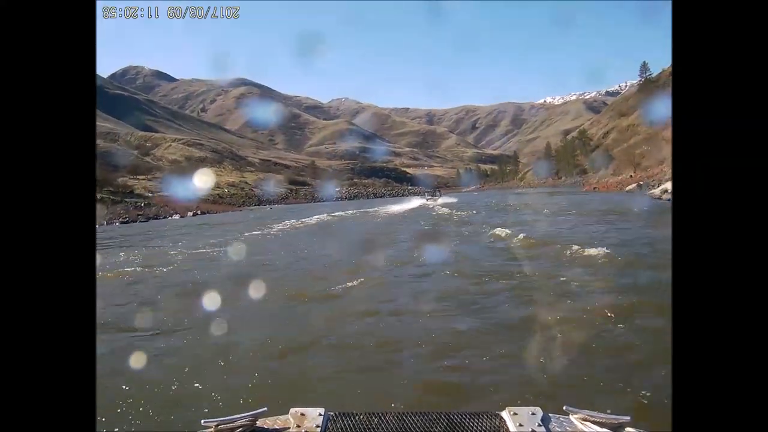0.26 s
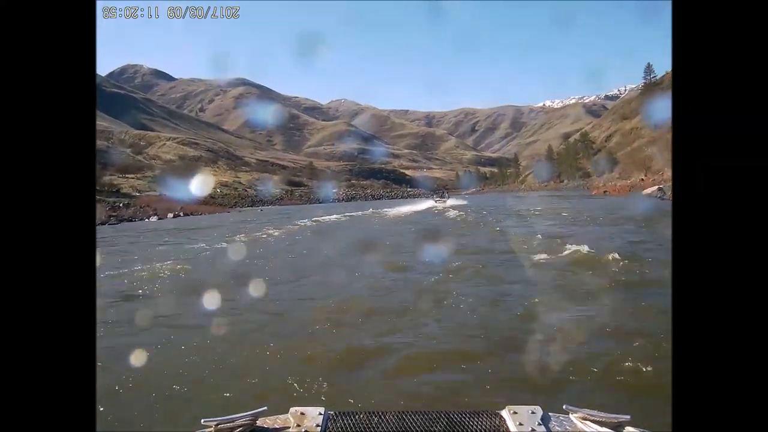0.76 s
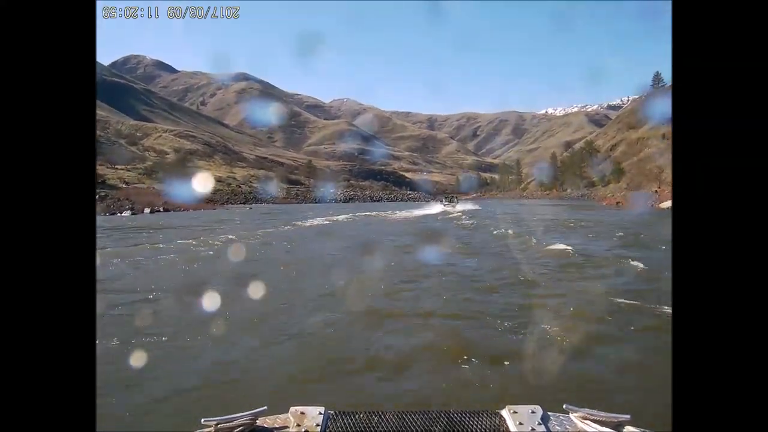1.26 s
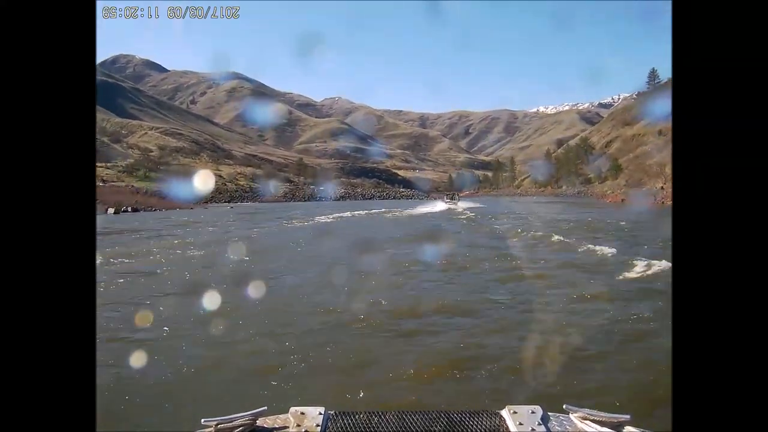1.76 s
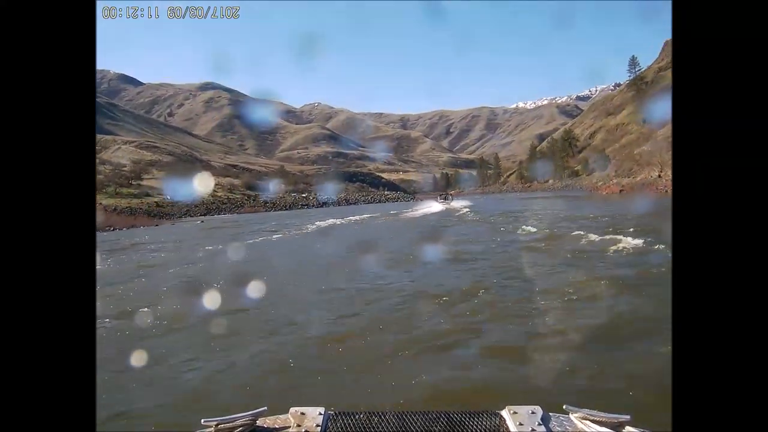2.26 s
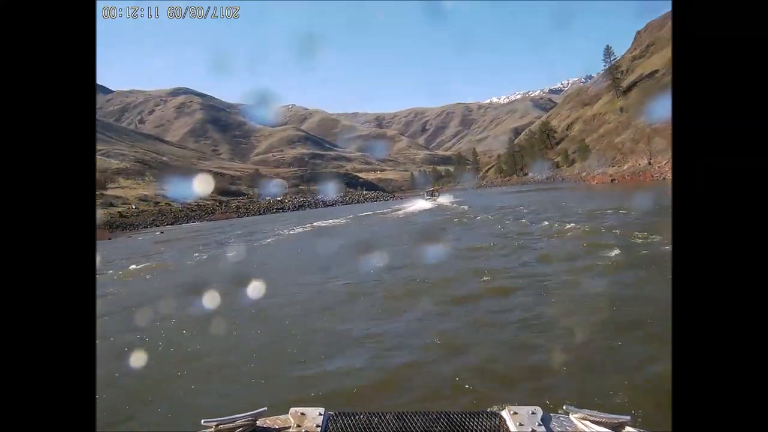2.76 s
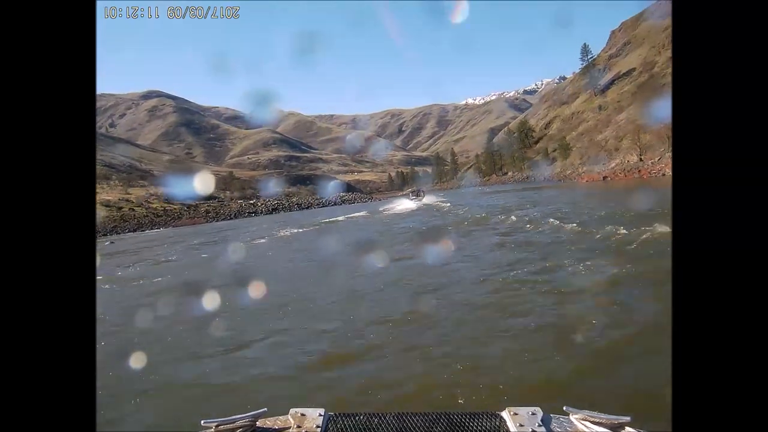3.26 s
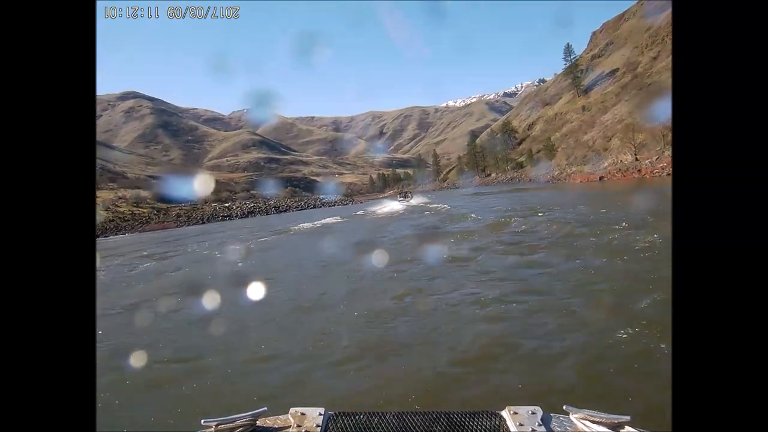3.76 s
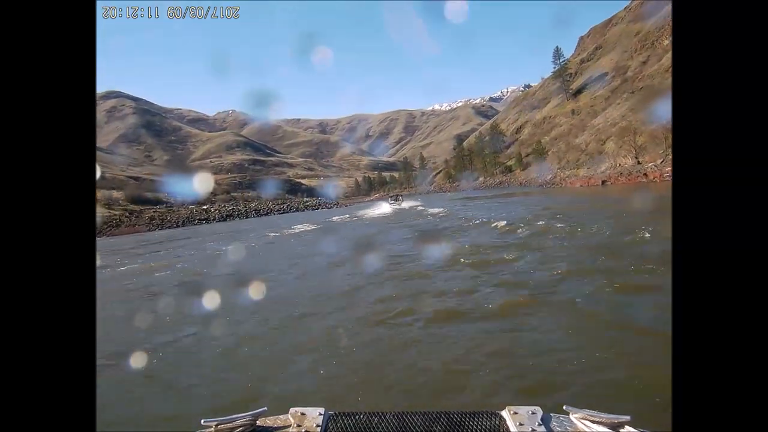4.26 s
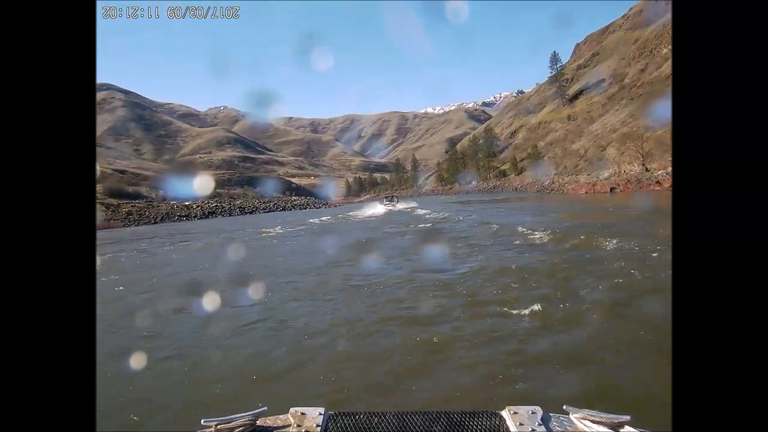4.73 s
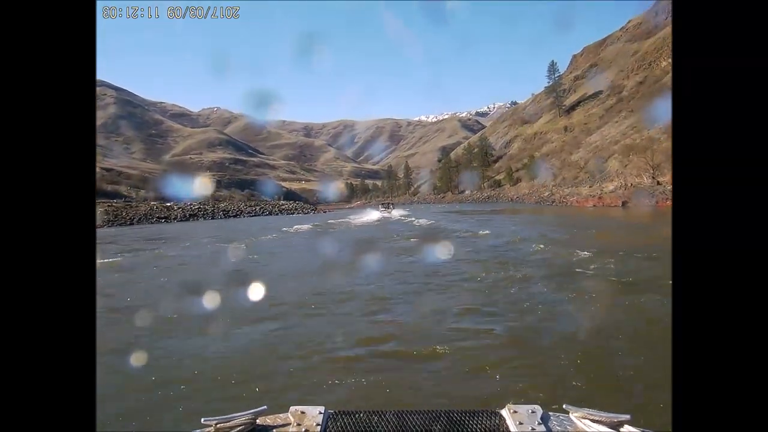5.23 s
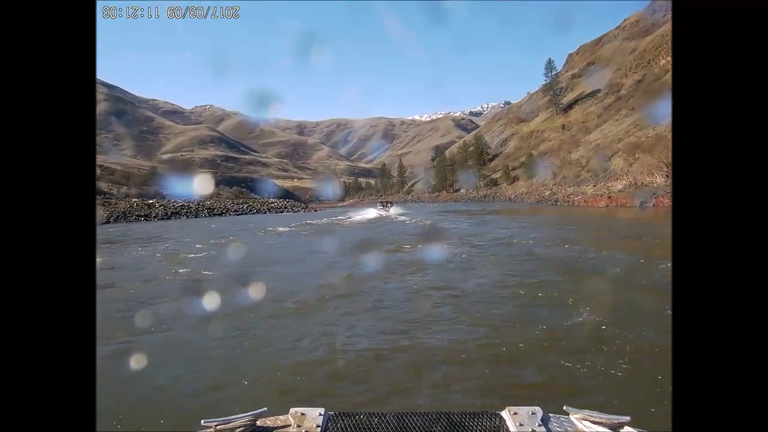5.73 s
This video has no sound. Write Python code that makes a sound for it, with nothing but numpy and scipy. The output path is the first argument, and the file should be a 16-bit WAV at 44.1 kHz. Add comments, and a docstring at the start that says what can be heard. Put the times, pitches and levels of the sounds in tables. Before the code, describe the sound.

Aboard a jet boat planing on a river, the microphone sits in a closed housing on the hull, so everything is close, boxy and muffled. A steady low engine hum holds its speed throughout, with a rougher, wavering hum above it. Water and jet roar continuously in the midrange, dipping slightly around 1.3 seconds and a little fuller later, beneath a thin spray hiss and a barely audible high electronic whine. From 0.2 to 0.8 seconds, quick bassy hull thuds come with dry knocks; another hit falls near 0.95. The hardest cluster, 1.4 to 1.9, jolts the mount into slaps and rattling clicks. More pounding follows at 2.15-2.45 and 3.0-3.3. Then the ride smooths, leaving mostly engine and water, with light bumps around 4.0, 4.3 and 4.8. A fresh burst of thumps and knocks arrives at 5.3-5.5, then calmer running to the end.

```python
"""Jet boat on a river

A jet boat planes along a river, heard inside a closed housing fixed to the hull.
The engine hums as sines on orders of its cycle; waves pound the hull as noise-driven modes and single swings.
Water and jet roar as noise through the resonances of the housing, above a faint electronic whine.
The mount slaps in single knocks and rattles in random clicks when the hull swings hard."""
import sys
import numpy as np
from scipy import signal
from scipy.io import wavfile
from scipy.ndimage import uniform_filter1d

SR = 44100
rng = np.random.default_rng(int(sys.argv[2]) if len(sys.argv) > 2 else 0)


def amplitude_ratio(level_db):
    """Convert a level in decibels to the matching linear amplitude (field) ratio."""
    exponent = np.asarray(level_db, float) / 20
    return 10 ** exponent


def bounce(signal):
    """Save signal as a 16-bit WAV file at the path given by the first command-line argument."""
    frames = np.transpose(np.atleast_2d(signal))
    limited = np.clip(frames, -1, 1)
    pcm = np.round(limited * 32767).astype(np.int16)
    wavfile.write(sys.argv[1], SR, pcm)


N = 264159

# hull panels under the pounding: (frequency [Hz], width of each pass [Hz], relative level [dB])
HULL_MODES = [(42.9, 22, -7), (61.4, 13, 1.5), (74.8, 11, 4), (101.5, 11.9, -2), (125.4, 6.8, -13),
              (152.4, 32, -18.5)]
# housing and mount: (frequency [Hz], width of each pass [Hz], relative level [dB])
HOUSING_MODES = [(189.6, 97, -8), (306.7, 140, -11), (513.5, 154, -8.5), (626, 113, -11.5),
                 (693.7, 76, -0.5), (734, 95, -8.5), (829, 103, -2), (928.7, 134, -2.5), (1134, 296, -10),
                 (1415, 295, -9), (1743.4, 149, -4.5), (2120, 154, -28), (2366, 340, -30.5),
                 (2795, 190, -33), (2986, 130, -33)]
# what the housing wall lets through above: (frequency [Hz], width of each pass [Hz], relative level [dB])
WALL_MODES = [(3070, 1030, -6), (4234, 750, -2), (5710, 3400, -7.5), (6940, 980, -1.5), (8440, 1050, -6.5),
              (9310, 1150, -3), (10660, 1560, -2.5), (12400, 1500, -11), (13300, 920, -8),
              (14300, 1100, -20), (15400, 1900, -8.5)]


def rms_one(x):
    """Scale to rms 1."""
    return x / np.sqrt(np.mean(x ** 2) + 1e-20)


def in_time(rows):
    """Columns of a curve table at every sample."""
    s, *columns = np.transpose(rows)
    return [np.interp(np.arange(N) / SR, s, c) for c in columns]


def drift(rate):
    """Slow chance of spread 1: noise twice through a one-pole low-pass with its corner at rate [Hz]."""
    # computed at every 40th sample, after a run-in of 2000 steps
    r = np.exp(-80 * np.pi * rate / SR)
    noise = rng.standard_normal(N // 40 + 2002)
    slow = signal.lfilter([1], [1, -2 * r, r * r], noise)[2000:]
    return np.interp(np.arange(N) / 40, np.arange(len(slow)), rms_one(slow))


def resonate(x, hz, width_hz):
    """A resonance passed twice, so that the valleys stay dark; gain 1 on top."""
    r = np.exp(-np.pi * width_hz / SR)
    gain = (1 - r * r) / 2
    stage = [gain, 0, -gain, 1, -2 * r * np.cos(2 * np.pi * hz / SR), r * r]
    return signal.sosfilt([stage, stage], x + 1e-18)


def noisy_modes(modes, flutter_db, rate):
    """Every mode is driven by noise of its own, fluttering partly with the others; rms 1."""
    shared = drift(rate)
    total = 0
    for hz, width_hz, db in modes:
        level = amplitude_ratio(db + flutter_db * (shared + drift(rate)))
        total = total + level * resonate(rng.standard_normal(N), hz, width_hz)
    return rms_one(total)


def struck_modes(modes, clicks):
    """One click train strikes all modes, signs alternating."""
    return sum((-1) ** k * amplitude_ratio(db) * resonate(clicks, hz, width_hz)
               for k, (hz, width_hz, db) in enumerate(modes))


def dip(x):
    """Narrow dips where paths through the housing cancel, each cut to its depth."""
    # (frequency [Hz], width [Hz], gain at the bottom [dB])
    cancellations = [(657, 31, -9.5), (759, 17, -2.5), (1091, 14, -12), (1233, 20, -8), (1461, 12, -12),
                     (1575, 24, -5.5), (1694, 39, -5), (2300, 110, -4.5), (2590, 96, -5)]
    for hz, width_hz, db in cancellations:
        notched = signal.lfilter(*signal.iirnotch(hz, hz / width_hz, SR), x)
        x = amplitude_ratio(db) * x + (1 - amplitude_ratio(db)) * notched
    return x


def ride_db(wave_offset_db):
    """Pounding level: the chop, plus each wave rising, holding for its length and dying away."""
    # small chop that always drums on the hull: (time [s], level [dB])
    chop = [(0.0, -28), (0.43, -30.5), (1.32, -31.5), (1.47, -32), (4.72, -34.5), (5.44, -27.5),
            (5.99, -34)]
    # larger waves passing under the hull: (start [s], length [s], level before the offset [dB])
    waves = [(0.188, 0.056, -24), (0.341, 0.03, -19.5), (0.428, 0.038, -29), (0.485, 0.054, -26),
             (0.686, 0.084, -25), (0.895, 0.041, -19), (0.93, 0.078, -25.5), (1.06, 0.047, -25),
             (1.372, 0.046, -22), (1.474, 0.047, -21), (1.541, 0.039, -27), (1.693, 0.018, -24),
             (1.72, 0.053, -17), (1.894, 0.025, -19.5), (2.157, 0.081, -15), (2.276, 0.03, -30),
             (2.354, 0.088, -25), (2.997, 0.128, -18.5), (3.11, 0.029, -28), (3.196, 0.044, -25),
             (3.285, 0.028, -17.5), (4.01, 0.057, -20), (4.337, 0.041, -22), (4.652, 0.028, -26.5),
             (5.003, 0.14, -26), (5.316, 0.2, -29)]
    rise_s, fall_s = 0.0084, 0.015
    t = np.arange(N) / SR
    chop_db, = in_time(chop)
    power = amplitude_ratio(chop_db) ** 2
    for start, length, db in waves:
        rise = np.clip((t - start) / rise_s + 1, 0, 1)
        fall = np.exp(-np.maximum(t - start - length, 0) / fall_s)
        power = power + (amplitude_ratio(db + wave_offset_db) * rise * fall) ** 2
    return 10 * np.log10(power)


def wave_swing_db():
    """Swing of the full pounding level about its mean, which jet and splash follow in part."""
    pounding_db = ride_db(0)
    return pounding_db - pounding_db.mean()


def load_db():
    """Load on the jet as a curve of water roar level."""
    # (time [s], level [dB])
    load = [(0, -31.5), (.4, -31.5), (.7, -33.5), (1.35, -35), (1.7, -33), (2.5, -32.5), (3.0, -33),
            (3.4, -31.5), (4.1, -32), (4.45, -31), (4.75, -31.5), (5.3, -31), (5.99, -32)]
    return in_time(load)[0]


def load_swing_db():
    """Swing of the load about its mean."""
    level_db = load_db()
    return level_db - level_db.mean()


def whine():
    """Steady electronic whine: pure sines."""
    # (frequency [Hz], rms level [dB])
    tones = [(6857, -77), (13714, -71)]
    t = np.arange(N) / SR
    return sum(np.sqrt(2) * amplitude_ratio(db) * np.sin(2 * np.pi * hz * t) for hz, db in tones)


def spray():
    """Steady fluttering hiss of spray through the wall of the housing."""
    return amplitude_ratio(-58) * noisy_modes(WALL_MODES, flutter_db=1.36, rate=31.0)


def splash():
    """Harder pounding throws more water against the plating: noise in the upper housing modes."""
    level_db = -60.5 + 0.27 * wave_swing_db()   # share of the waves' swing in dB
    return amplitude_ratio(level_db) * noisy_modes(HOUSING_MODES[11:], flutter_db=2.64, rate=31.0)


def jet():
    """Jet noise in the middle housing modes, following load and waves by shares of their swings in dB."""
    level_db = -37 + 0.55 * load_swing_db() + 0.074 * wave_swing_db()
    return amplitude_ratio(level_db) * noisy_modes(HOUSING_MODES[8:11], flutter_db=1.0, rate=35.0)


def intake():
    """The intake band near 700 Hz opens up most with load."""
    level_db = -35.5 + 2.7 * load_swing_db()
    return amplitude_ratio(level_db) * noisy_modes(HOUSING_MODES[4:6], flutter_db=0.76, rate=16.0)


def water_roar():
    """Water roars as noise through the housing modes around the intake band, at the level of the load."""
    modes = HOUSING_MODES[:4] + HOUSING_MODES[6:8]
    return amplitude_ratio(load_db()) * noisy_modes(modes, flutter_db=1.06, rate=11.7)


def rattle_clicks(shake):
    """Loose play in the mount: clicks fall when the hull swings hard one way."""
    lag_s, clicks_per_s, spread_db = 0.0022, 650.0, 3.0   # click rate at a swing of 1
    late_shake = np.roll(shake, round(lag_s * SR))
    swing = np.clip(-late_shake / 0.051, 0, 2.5)
    born = rng.random(N) < clicks_per_s * swing ** 2 / SR
    sizes = amplitude_ratio(spread_db * np.minimum(rng.exponential(1, N), 3.0))
    return born * sizes * rng.choice([-1, 1], N)


def mount_rattle(clicks):
    """Hard, small contacts excite the upper housing modes most."""
    contact = signal.lfilter([1, -1], [1, -.8], amplitude_ratio(-6.5) * clicks)
    return struck_modes(HOUSING_MODES, contact)


def knocks():
    """Each slap is one hard contact with a faint dying cluster after it; the cluster alone drives the treble."""
    # slaps that jolt the mount: (time [s], relative level [dB], extra brightness [dB])
    jolts = [(0.185, -34, -3), (0.447, -23, 3), (0.6972, -17, -5), (0.714, -24, 2), (0.7296, -18, 1),
             (0.813, -30, -3), (0.9554, -26, 14), (1.162, -22.5, -2), (1.3708, -22, 0), (1.4716, -18, -3),
             (1.4984, -14, 5), (1.505, -18, 1), (1.5396, -29, 3), (1.5515, -34, 4), (1.6806, -16, 3),
             (1.683, -22, 2), (1.697, -22, 2), (1.7057, -14.5, 7), (1.7096, -24, 0), (1.74, -32, 6),
             (1.831, -32, 3), (1.905, -25, 5), (2.19, -34, -2), (2.228, -17.5, 5), (2.3138, -22, 2),
             (2.4289, -26, -3), (2.696, -22, -1), (2.999, -19, 3), (3.0765, -21, 1), (3.1078, -28, 13),
             (3.1572, -18, -3), (3.162, -30, -2), (3.2913, -24.5, 9), (4.304, -24, -4), (4.8044, -21, -6),
             (5.018, -37, 4), (5.186, -26, 5), (5.328, -18, 3), (5.344, -25, 1), (5.4604, -21.5, -1)]
    length = 1500   # samples in a cluster
    body, bright = np.zeros((2, N + length))
    t = np.arange(length) / SR
    fade = 0.22 * np.exp(-t / 0.0025) + 0.061 * np.exp(-t / 0.0096)
    clusters = rng.standard_normal((len(jolts), length)) * fade
    for (s, db, bright_db), cluster in zip(jolts, clusters):
        at = round(s * SR)
        body[at] += 2.67 * amplitude_ratio(db)
        body[at:at + length] += amplitude_ratio(db) * cluster
        bright[at:at + length] += amplitude_ratio(db + bright_db) * cluster
    return body[:N], bright[:N]


def slaps(body, bright):
    """A slap presses the mount shut, so it rings only in a few damped modes."""
    # (frequency [Hz], width of each pass [Hz], gain [dB])
    shut_modes = [(835, 410, 20), (1290, 740, 12), (1730, 364, 16.5), (2460, 870, -4.5)]
    low_pass = signal.butter(4, 2280, fs=SR, output="sos")   # corner in Hz
    dull = signal.sosfilt(low_pass, body)
    return struck_modes(shut_modes[:3], dull) + struck_modes(shut_modes[3:], bright)


def ticks(clicks, bright):
    """Treble of rattle and slaps; the wall passes the lower treble of the ticks best."""
    source = amplitude_ratio(-47.0) * clicks + amplitude_ratio(-21) * bright
    return struck_modes(WALL_MODES, signal.lfilter([1], [1, -.6], source))


def engine():
    """Sines on the orders of the cycle; uneven firing makes each waver in level and phase, high orders most."""
    # (multiple of the cycle, level relative to the engine level [dB])
    orders = [(1, -20), (2, -8.5), (3, -3), (4, -3), (5, -12), (6, -12), (7, -21), (8, -8), (9, -16),
              (10, -17), (11, -22), (12, -19), (13, -11.5), (14, -20.5), (15, -27), (16, -19), (18, -17.5),
              (19, -15.5), (20, -18), (21, -16), (22, -20), (23, -18), (24, -16), (25, -12), (27, -24.5),
              (28, -6.5), (29, -14.5), (30, -13), (38, -14.5), (48, -17.5)]
    # orders that swell or fade for a while: (multiple of the cycle, middle [s], length [s], change [dB])
    swells = [(8, 0.96, 0.33, -3), (8, 4.0, 0.79, -3.5), (8, 5.9, 1.57, -12), (13, 1.54, 0.78, -9.5),
              (10, 4.0, 0.78, 3), (13, 2.8, 3, 6), (13, 5.6, 0.8, -4.5), (28, 2.4, 3.9, -5)]
    engine_db, cycle_hz, speed_wander = -35, 24.68, .0008   # wander as a share of the cycle rate
    t = np.arange(N) / SR
    turn = 2 * np.pi * np.cumsum(cycle_hz * (1 + speed_wander * drift(0.495))) / SR
    out = 0
    for order, db in orders:
        swell_db = sum(change * np.exp(-(2 * (t - middle) / length) ** 4)
                       for k, middle, length, change in swells if round(k) == round(order))
        loose = 0.18 + min(order / 27.9, 1) ** 4
        level = np.sqrt(2) * amplitude_ratio(engine_db + db + swell_db + 2.2 * loose * drift(1.75))
        waver = 0.096 * drift(2.5) + 1.97 * (loose - .2) * drift(8.1)   # radians
        out = out + level * np.sin(order * turn + waver + rng.uniform(0, 2 * np.pi))
    return out


def wave_drumming():
    """Chop and waves drum at random on the hull panels: noise through their modes."""
    drumming = noisy_modes(HULL_MODES, flutter_db=1.8, rate=8.2)
    # held fairly even, so that the waves shape its level
    power = uniform_filter1d(drumming ** 2, round(0.027 * SR))
    drumming = rms_one(drumming / (power + 0.15) ** 0.26)
    return amplitude_ratio(ride_db(-9)) * drumming   # waves are lowered here, beside their drops


def drops():
    """Each hard drop onto the water swings the hull: a small lift, a deep trough, a rebound that settles."""
    # (deepest moment [s], depth of the single swing [dB])
    falls = [(0.2012, -19), (0.213, -17.5), (0.242, -21.5), (0.2534, -18), (0.309, -17.5), (0.361, -18.5),
             (0.446, -22), (0.543, -19), (0.6466, -22), (0.7124, -19.5), (0.727, -15.5), (0.7435, -24),
             (0.755, -28), (0.94, -16.5), (0.9546, -16), (1.469, -16.5), (1.4815, -15.5), (1.4987, -16),
             (1.5101, -22), (1.551, -16), (1.578, -21.5), (1.6677, -20), (1.68, -12), (1.828, -18),
             (2.197, -20), (2.209, -24), (2.2262, -17.5), (2.29, -19.5), (2.308, -23), (2.3894, -20.5),
             (3.0063, -22.5), (3.021, -18.5), (3.056, -25), (3.0752, -25.5), (3.0863, -17.5),
             (3.1558, -16.5), (3.2043, -20), (3.2492, -18.5), (3.2842, -23), (3.2962, -22), (3.3164, -23),
             (4.937, -22.5), (5.313, -20), (5.3265, -18), (5.3415, -15), (5.3572, -23), (5.3788, -17),
             (5.4084, -18.5), (5.4612, -23)]
    swing_hz, build_s, settle_s = 76, .006, .0068
    sharpness = .2   # share of the octave that narrows the trough
    t = np.arange(-2000, 2000) / SR
    out = np.zeros(N + 4000)
    turn = 2 * np.pi * swing_hz * t
    swing = -(np.cos(turn) + sharpness * np.cos(2 * turn)) / (1 + sharpness)
    swing = swing * np.exp(-.5 * (t / np.where(t < 0, build_s, settle_s)) ** 2)
    for s, db in falls:
        at = round(s * SR)
        out[at:at + len(t)] += amplitude_ratio(db) * swing
    return out[2000:N + 2000]


def hull_pounding():
    """Drumming and drops, which ring the panels, on a hull that yields more downwards than upwards."""
    hits = drops()
    ringing = amplitude_ratio(-8.5) * struck_modes(HULL_MODES[1:4], hits)
    pounding = wave_drumming() + hits + ringing
    sag = pounding ** 2 - uniform_filter1d(pounding ** 2, round(0.021 * SR))
    return pounding - 0.8 * sag


def scene():
    """All sources, as they reach the microphone through hull and housing."""
    hum = engine()
    pounding = hull_pounding()
    clicks = rattle_clicks(pounding + hum)
    body, bright = knocks()
    water = water_roar() + intake() + jet() + splash() + spray()
    mount = mount_rattle(clicks) + slaps(body, bright) + ticks(clicks, bright)
    return (hum + pounding + dip(water + mount) + whine())[None]


def roll_off(x):
    """The treble ends steeply here."""
    return signal.sosfilt(signal.butter(12, 15720, fs=SR, output="sos"), x)


def record(dry):
    """The finished mix goes out at its own level."""
    return roll_off(dry)


dry = scene()
out = record(dry)
bounce(out)
```